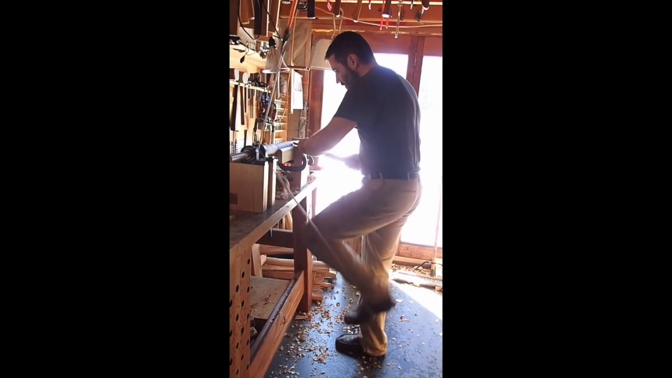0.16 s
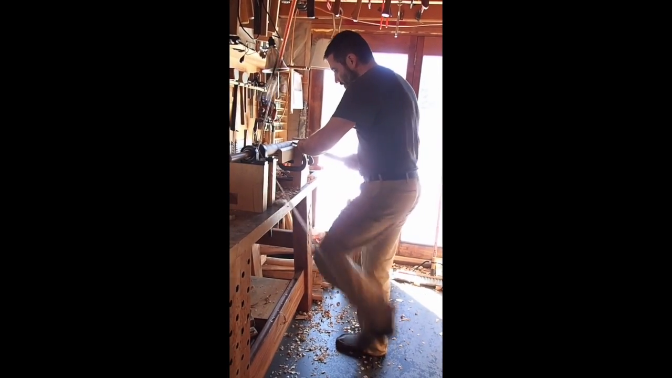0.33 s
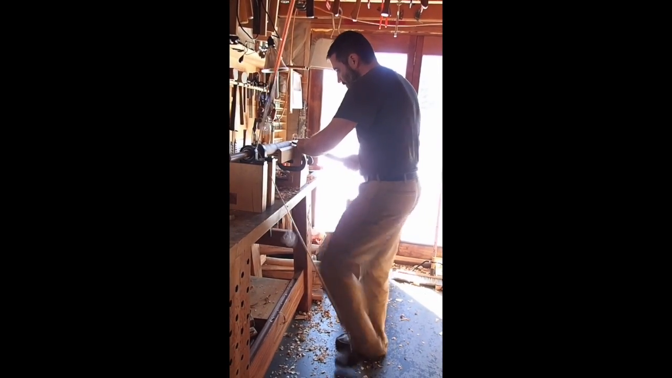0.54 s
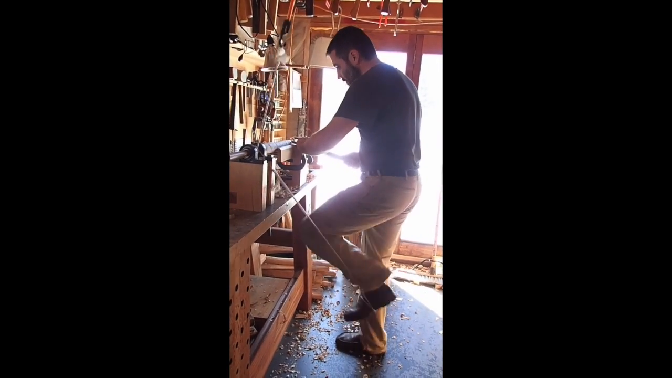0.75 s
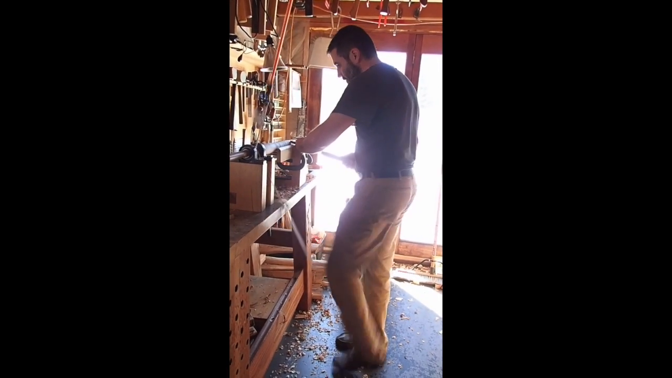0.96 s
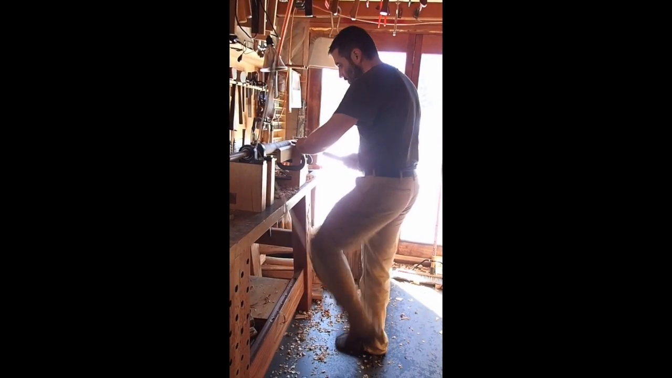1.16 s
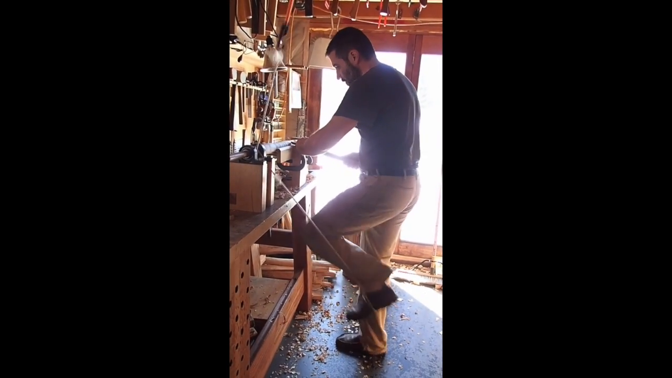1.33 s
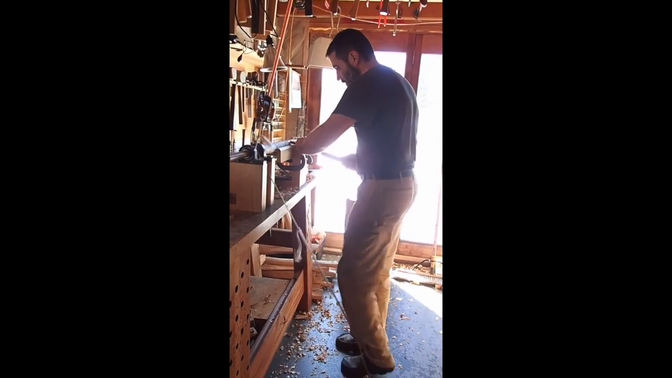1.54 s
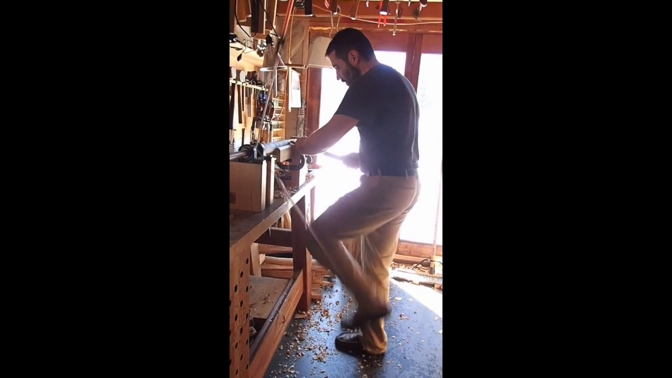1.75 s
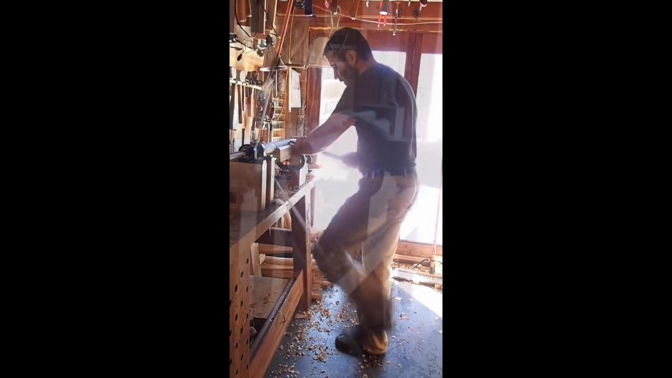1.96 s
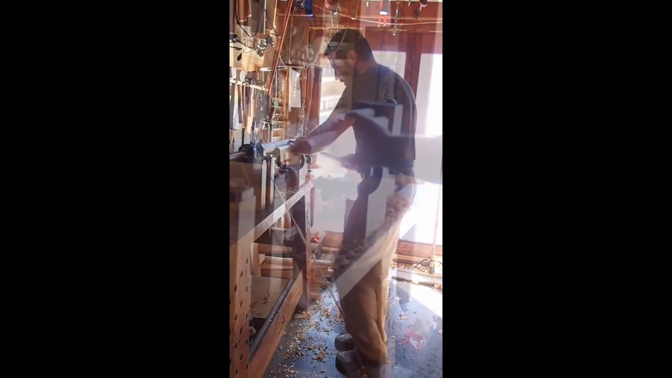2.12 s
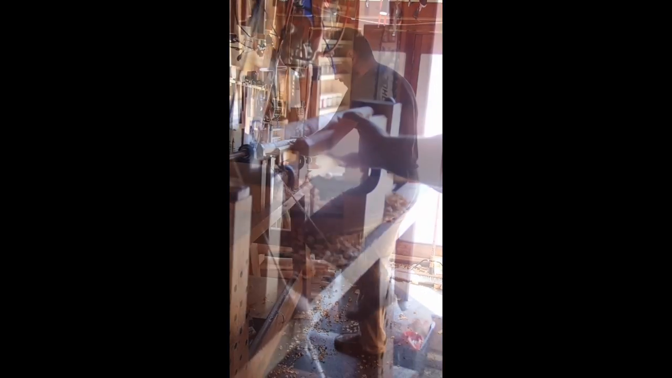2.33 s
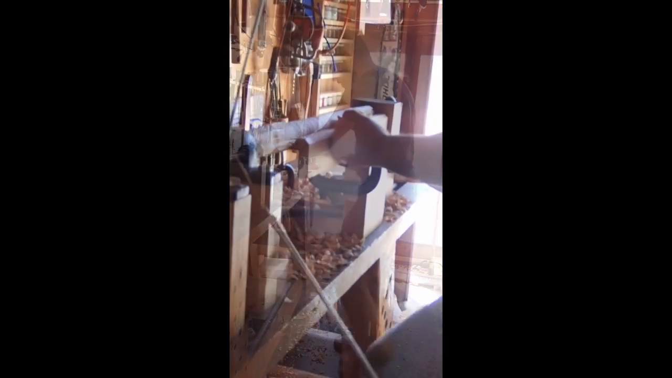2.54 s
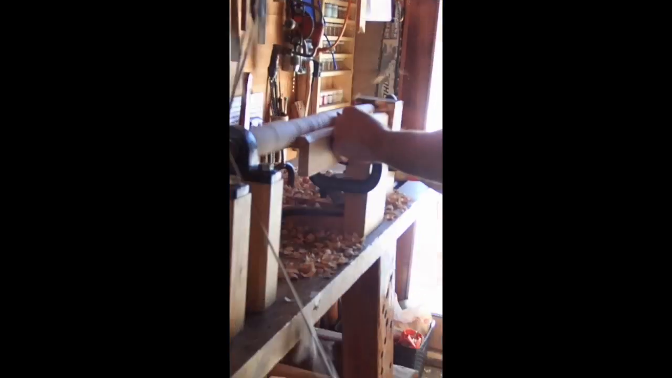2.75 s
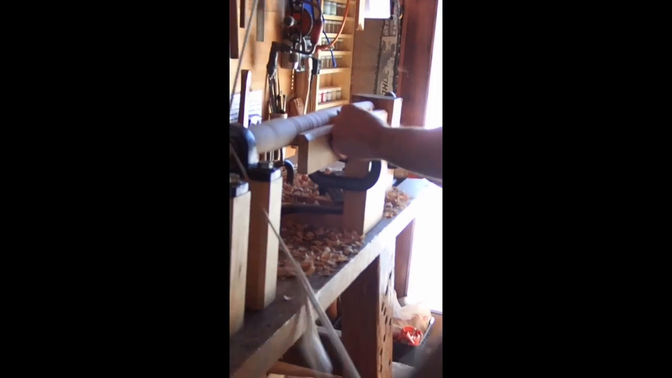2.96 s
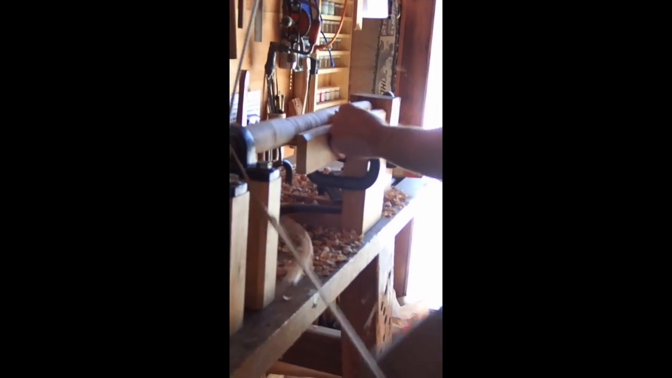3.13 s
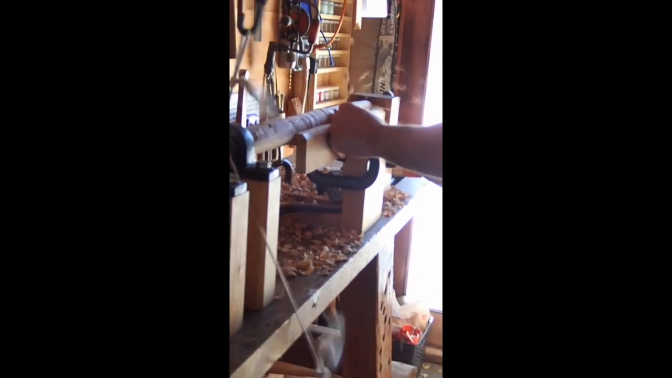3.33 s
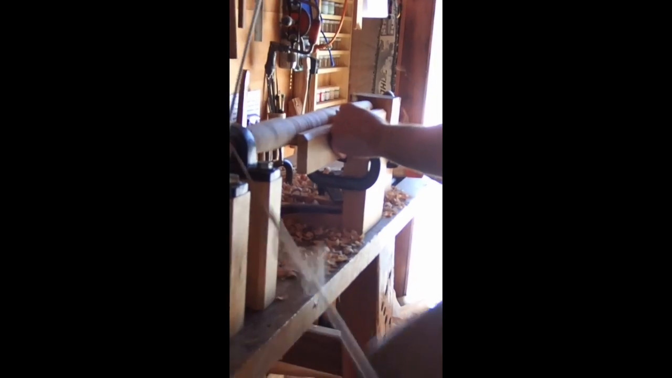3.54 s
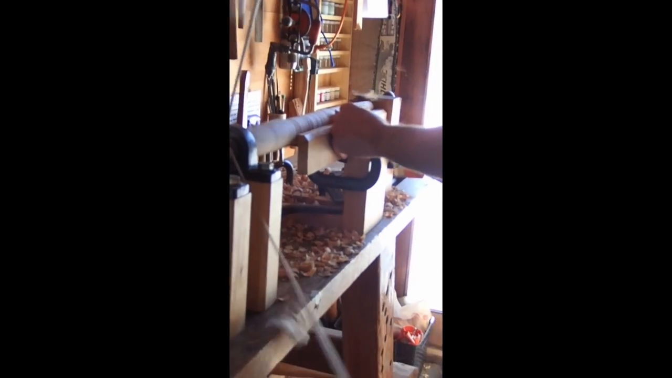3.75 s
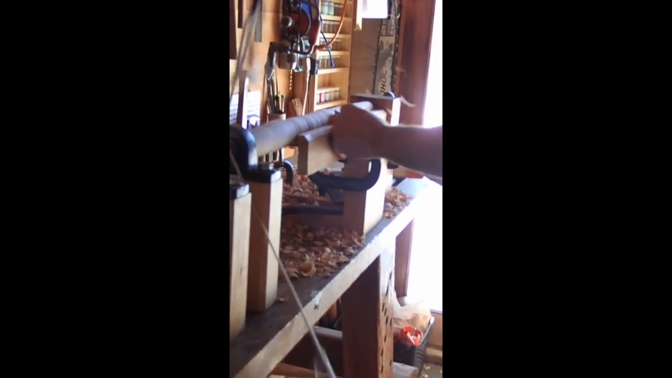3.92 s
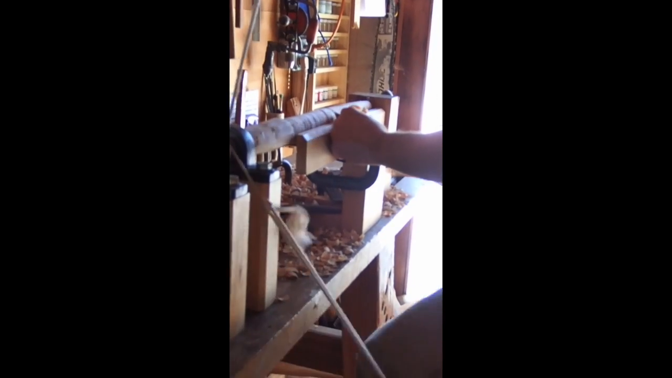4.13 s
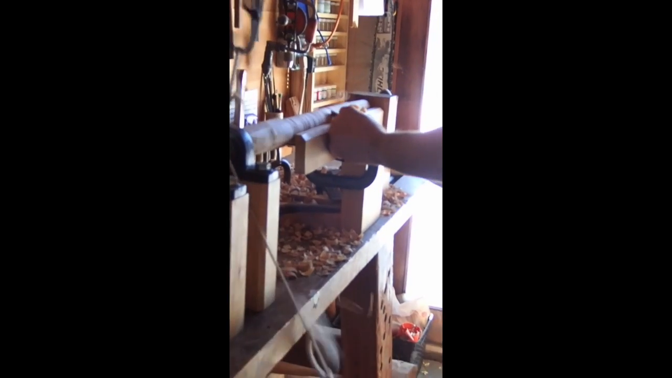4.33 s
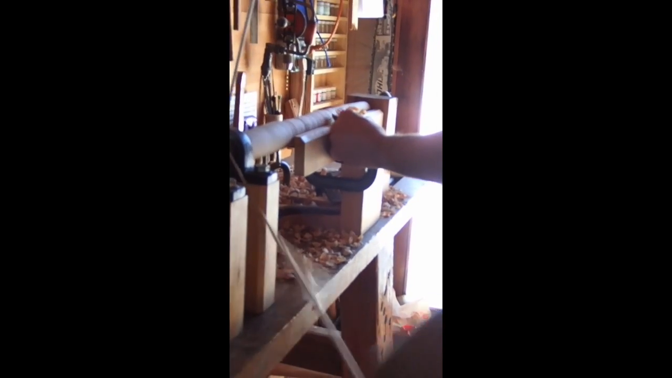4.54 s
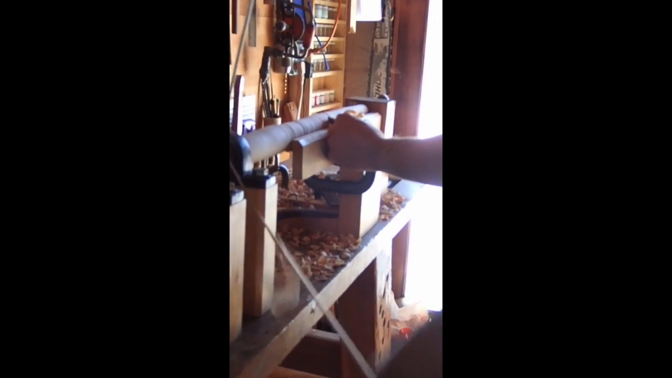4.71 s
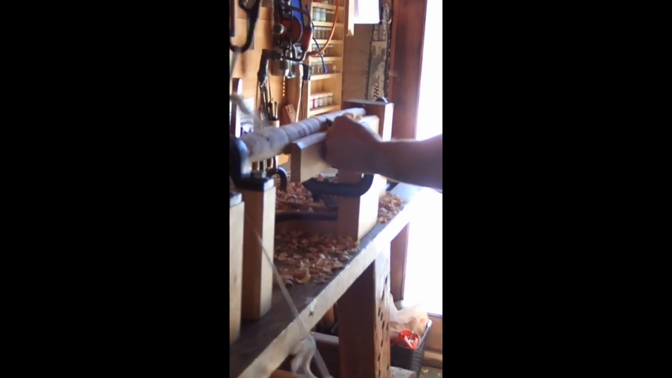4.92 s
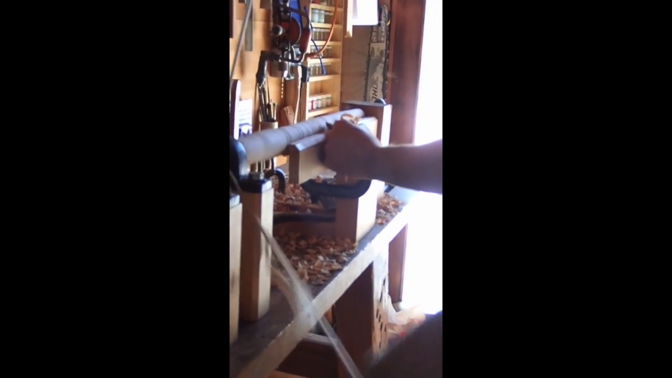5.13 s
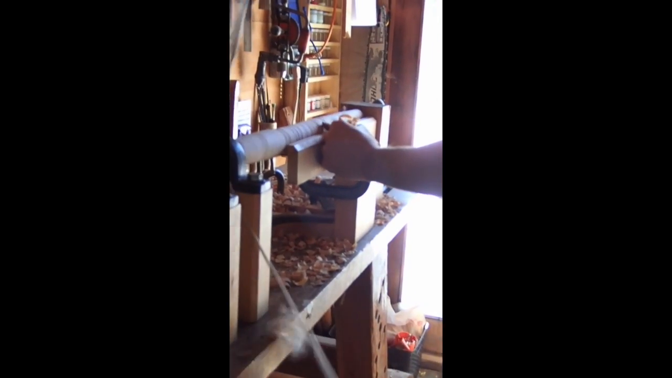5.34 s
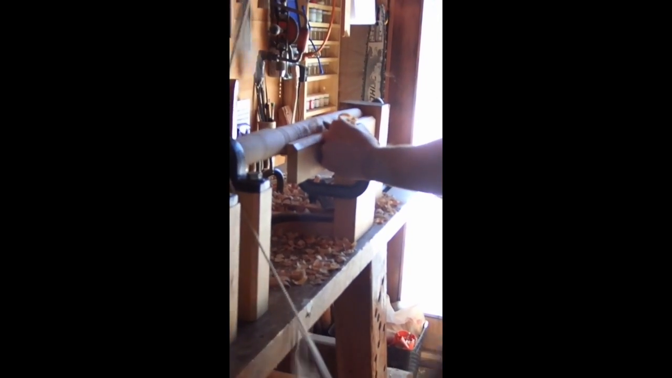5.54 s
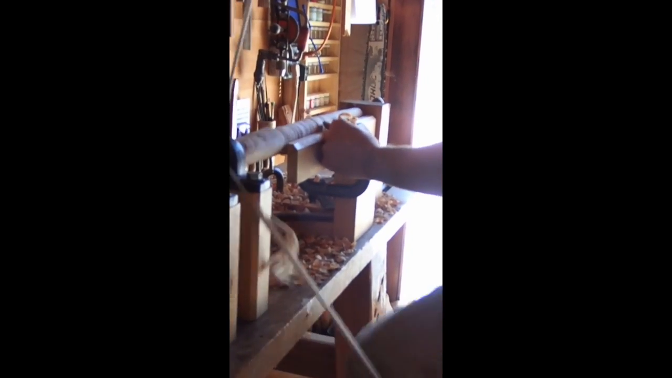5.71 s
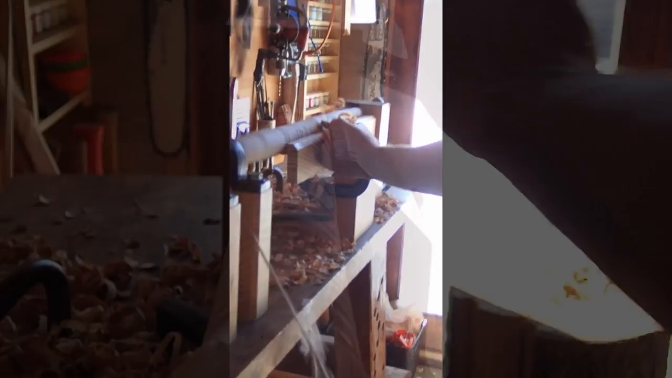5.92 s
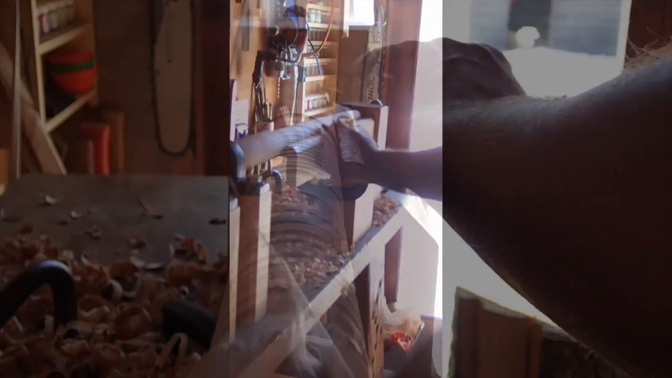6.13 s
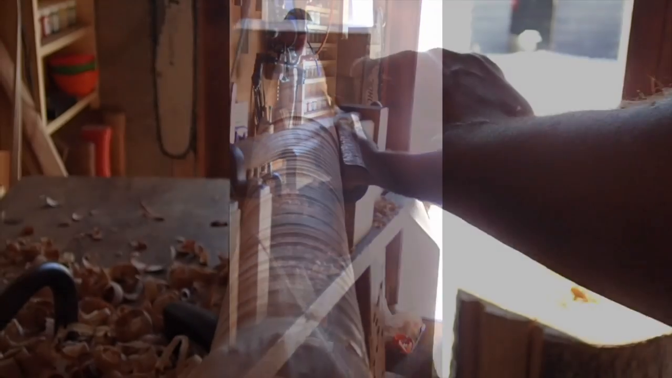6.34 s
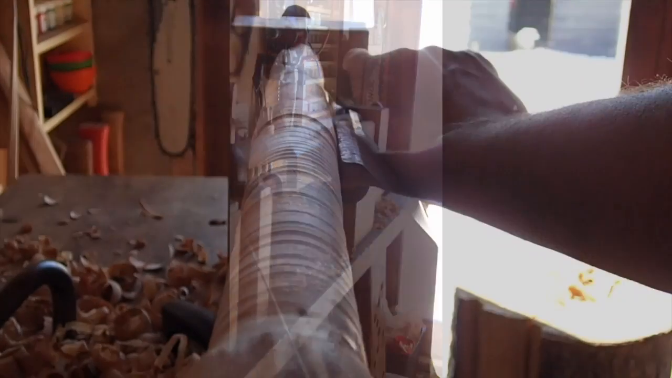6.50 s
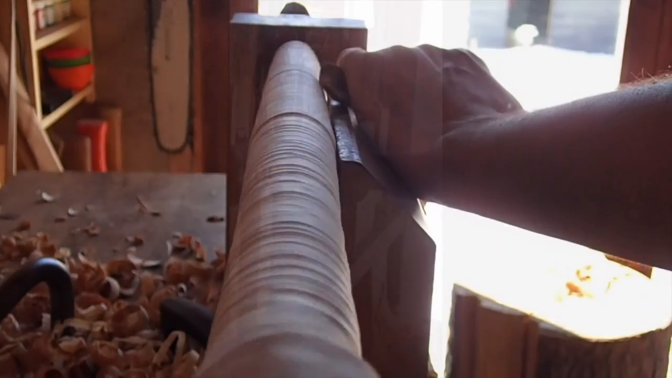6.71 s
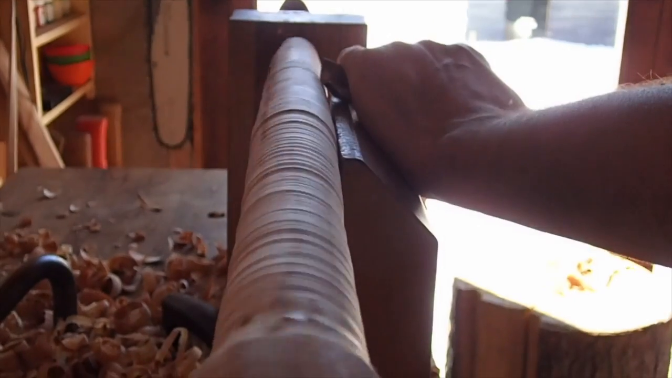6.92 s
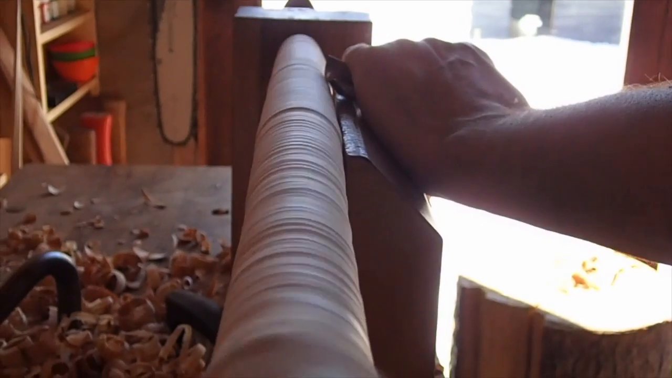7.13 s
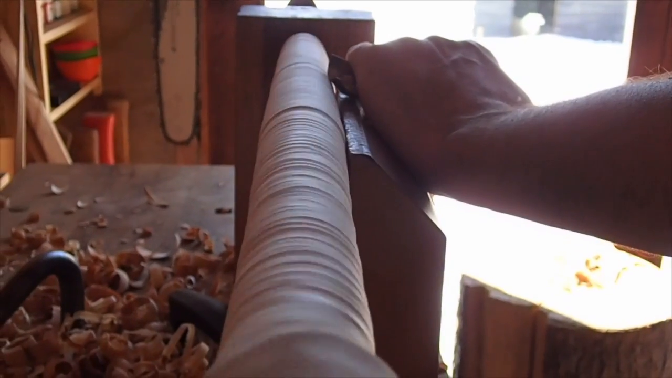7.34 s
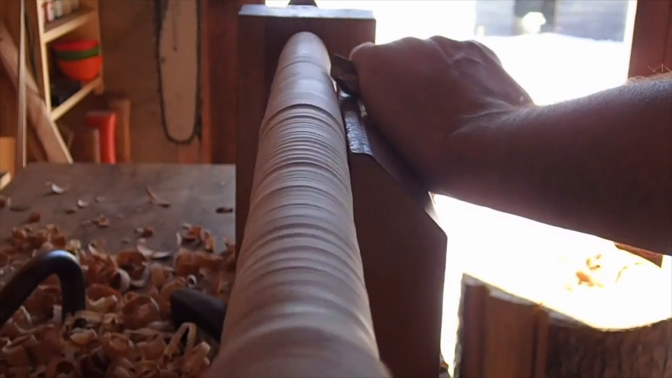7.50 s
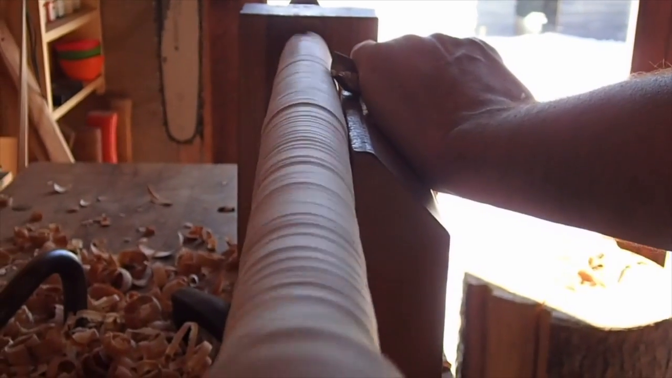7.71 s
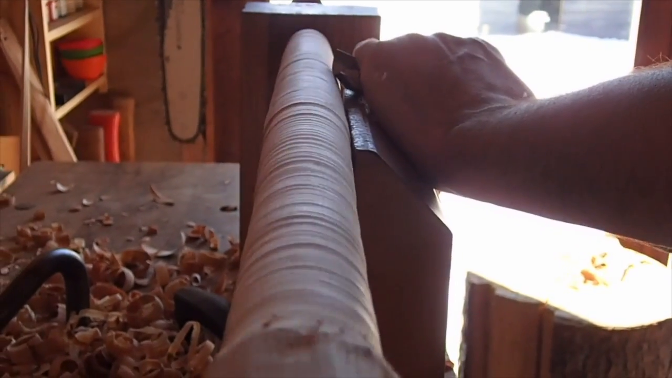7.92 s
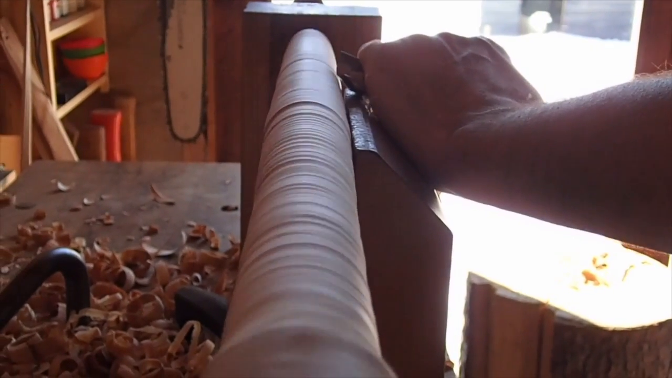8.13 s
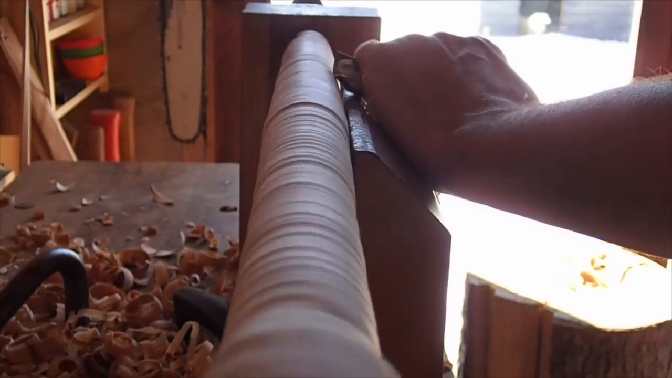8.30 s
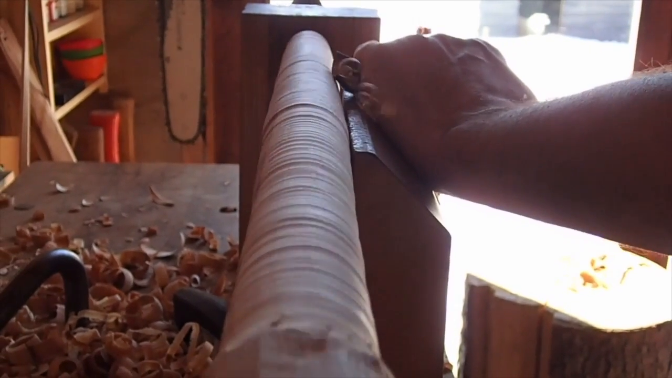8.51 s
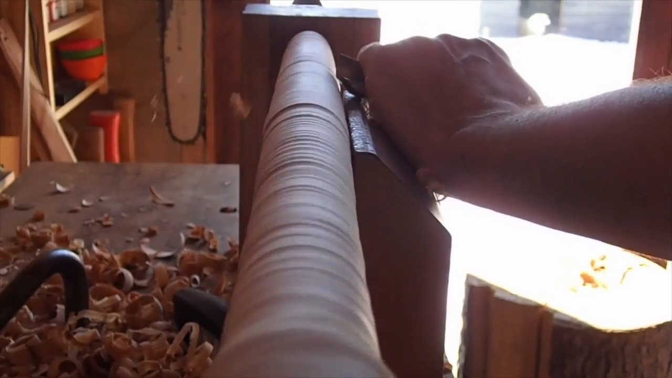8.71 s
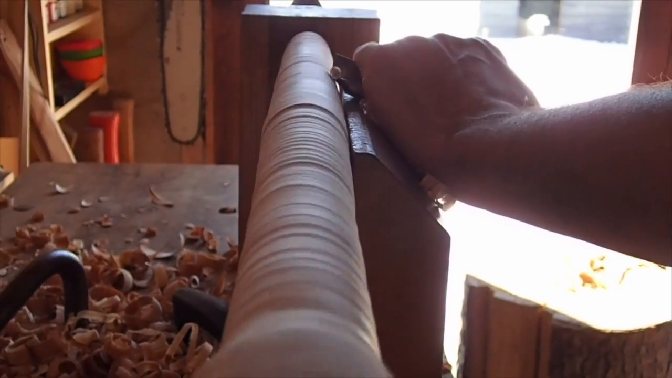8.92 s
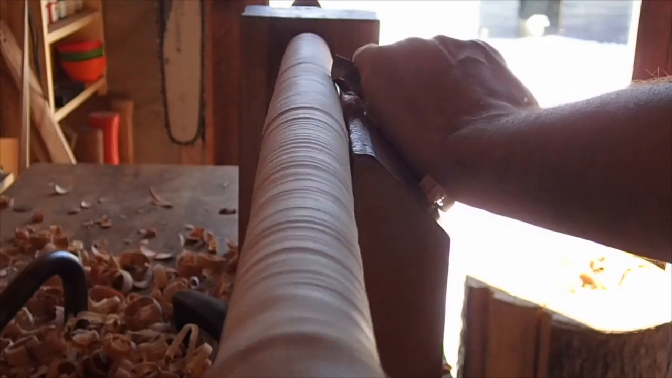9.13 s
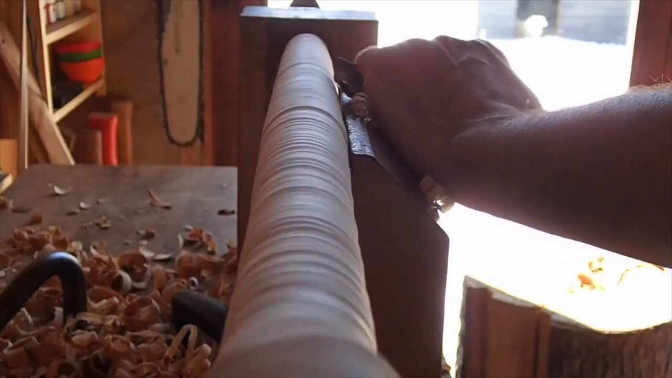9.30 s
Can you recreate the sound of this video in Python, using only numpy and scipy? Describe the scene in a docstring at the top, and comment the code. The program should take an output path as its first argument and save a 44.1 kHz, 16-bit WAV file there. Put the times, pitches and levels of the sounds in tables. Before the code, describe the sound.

A treadle lathe works in a small wooden workshop with a short, dry echo and faint steady hiss. From the start, gritty cutting strokes come roughly every half second, each about 0.2 seconds: a bright tearing hiss over hollow wood resonance, with a slight steel ring. Between them the blank spins back with a soft rub. Chips snap and wood knocks lightly, notably near 0.9 and 1.4. Around 2.2 to 2.5 come two weaker scrapes, then at 2.7 the listening place changes and the even rhythm continues, with tiny dry squeaks near 4.1 and 4.7. After a weaker cut at 6.3, the place moves beside the blank at 6.7: low wooden chatter and small knocks, then cuts building near 7.2, at 7.8, a crisp one at 8.4 and another at 9.0, with louder return rubs and sharp chip clicks near 8.55 and 9.0, ending in rubbing around 9.4.

```python
"""Spring-pole lathe in a wooden workshop

Heard from three listening places in turn, the last beside the blank. Each tread spins the blank into the
gouge: a fine tearing noise drives the shaving's hiss, a coarser one with the same slow swells drives the
modes of blank and bed, and a smoother noise makes the steel sing. On the spring back the blank only rubs the
edge. Chips snap off as clicks, wood knocks as short sine bursts, a dry centre squeaks. The room's answer and
a quiet hiss lie underneath.
"""
import sys
import numpy as np
from scipy import signal
from scipy.fft import rfft, irfft, next_fast_len
from scipy.io import wavfile
from scipy.ndimage import uniform_filter1d, map_coordinates

SR = 44100
rng = np.random.default_rng(int(sys.argv[2]) if len(sys.argv) > 2 else 0)


def to_wav(sig):
    """Store sig (one row per channel, or 1-D mono) as 16-bit WAV at the path in sys.argv[1].

    Samples outside -1..1 are clipped; the rate is SR.
    """
    pcm = np.clip(np.atleast_2d(sig), -1, 1) * 32767
    pcm = np.round(pcm).astype(np.int16)
    wavfile.write(sys.argv[1], SR, pcm.T)  # frames by channels


N = 417186


def amp(db):
    """Decibels to gain."""
    return 10 ** (np.asarray(db) / 20)


def unit(x):
    """Scaled to rms 1."""
    return x / np.sqrt(np.mean(x ** 2) + 1e-20)


def along(points, hz):
    """Curve through (f/Hz, value) points on a log frequency axis."""
    f, v = np.transpose(points)
    return np.interp(np.log(hz + 1), np.log(f + 1), v)


def wobble(rate):
    """A smooth random curve, rate knots a second."""
    knots = rng.standard_normal(int(N * rate / SR) + 4)
    return map_coordinates(knots, [np.arange(N) * rate / SR])


def filtered(x, response):
    """x shaped by a complex response of frequency."""
    m = next_fast_len(x.shape[-1] + 8192)  # room for the ringing
    spectrum = rfft(x, m) * response(np.fft.rfftfreq(m, 1 / SR))
    return irfft(spectrum, m)[..., :x.shape[-1]]


def causal(points):
    """Minimum-phase response of (f/Hz, level/dB) points, so that clicks ring after the blow."""
    def response(f):
        cepstrum = irfft(np.log(amp(along(points, f))))
        cepstrum[1:len(f) - 1] *= 2
        cepstrum[len(f):] = 0
        return np.exp(rfft(cepstrum))
    return response


def modes(table, place):
    """A body's resonances at one place: damped modes summed with alternating sign."""
    def response(f):
        total = 0
        for k, row in enumerate(table):
            hz, width, level_db = row[0], row[1], row[2 + place]
            damping = 1j * f * width
            total = total + (-1) ** k * amp(level_db) * damping / (hz ** 2 - f * f + damping)
        return total
    return response


def patchy(x, depth_db, bins, frames):
    """Random gain patches over time and frequency, alike in both rows."""
    z = signal.stft(x, nperseg=512)[2]
    field = uniform_filter1d(rng.standard_normal(z.shape[1:]), bins, 0)
    field = uniform_filter1d(field, frames, 1)
    return signal.istft(z * amp(depth_db * unit(field)), nperseg=512)[1][:, :N]


# moments when the listening place changes: t/s
MOVE_TIMES = [2.676, 6.67]


def places():
    """Sample ranges of the three listening places."""
    edges = [0] + [round(s * SR) for s in MOVE_TIMES] + [N]
    return [slice(a, b) for a, b in zip(edges, edges[1:])]


# spectrum of room air and microphone hiss: f/Hz, relative level per Hz/dB
STILL_SPECTRUM = [(18, -49), (30, -5.5), (327, -1.5), (511, -4.5), (757, -5.5), (1460, -9), (1850, -13),
                  (3120, -20), (4060, -20), (5420, -6.5), (9410, -17), (14300, -20.5), (15900, -31)]
# its mean level at each listening place: level/dB
STILL_LEVELS = [-50, -49.5, -50.5]


def still():
    """The quiet workshop and the microphones' own hiss: coloured noise with a slowly wavering level."""
    air = unit(filtered(rng.standard_normal((2, N)), lambda f: amp(along(STILL_SPECTRUM, f))))
    place = np.searchsorted(MOVE_TIMES, np.arange(N) / SR)
    return air * amp(np.array(STILL_LEVELS)[place] + 0.8 * wobble(6))


# decay of the workshop's answer: f/Hz, time to fall 60 dB t60/s
SHOP_DECAY = [(200, 0.39), (2000, 0.16), (10000, 0.083)]


def shop(x):
    """Reverberation from a noise tail in which each frequency dies at its own speed."""
    hz, t, z = signal.stft(rng.standard_normal((2, SR // 2)), SR, nperseg=256)
    decay = amp(-60 * t / along(SHOP_DECAY, hz)[:, None])
    tail = signal.istft(z * decay, SR, nperseg=256)[1]
    late = np.pad(x, ((0, 0), (300, 0)))  # pre-delay in samples
    return signal.fftconvolve(late, tail / np.linalg.norm(tail[0]), axes=1)[:, :N]


# a dry centre as the blank turns about: t/s, length/s, f/Hz, level/dB before the wavering
SQUEAK_EVENTS = [(4.11, .05, 1705, -51), (4.696, 0.042, 1700, -51)]


def squeaks():
    """Short wavering tones of wood on steel: sines under a rounded envelope."""
    out = np.zeros(N)
    for s, length, hz, db in SQUEAK_EVENTS:
        t = np.arange(round(length * SR)) / SR
        envelope = np.sin(np.pi * t / length) ** 0.4
        out[round(s * SR):][:len(t)] = amp(db) * np.sin(2 * np.pi * hz * t) * envelope
    return out * amp(1.5 * wobble(90))


# chips that snap off: t/s, relative click level/dB
CHIP_SNAPS = [(0.3714, -15), (0.4614, -17), (0.889, 0), (1.4367, 0.5), (1.5604, -5), (1.8921, -17),
              (2.683, -7), (3.7007, -2), (4.1855, -18), (4.7768, 0), (5.3338, -13), (6.1254, -24),
              (6.739, -19), (7.9504, -3), (8.5508, 4.5), (9.0204, 0), (9.141, -9)]
# the blank knocks in its seats or chatters against the edge: t/s, force level/dB, f/Hz, length/s
WOOD_KNOCKS = [(0.083, -40, 1370, 0.016), (0.34, -30, 1193, .02), (0.458, -22, 1060, .003),
               (0.885, -26, 1600, 0.029), (.922, -27, 1600, 0.017), (1.033, -30, 1316, 0.029),
               (1.445, -28.5, 1600, 0.013), (1.987, -27, 1200, 0.014), (2.24, -36, 1354, 0.0099),
               (3.203, -30, 1356, 0.012), (4.257, -24, 1270, 0.0054), (4.774, -28.5, 713, 0.01),
               (5.338, -27.5, 1330, 0.0072), (5.836, -30.5, 1360, .012), (5.965, -30.5, 790, 0.0072),
               (6.123, -34, 730, 0.003), (6.684, -40, 94.2, 0.021), (6.704, -45.5, 466, 0.014),
               (6.734, -46, 470, .015), (6.811, -36, 398, 0.0073), (6.822, -38, 436, .012),
               (6.839, -38, 380, .022), (6.951, -35.5, 445, 0.0069), (6.972, -43, 420, .012),
               (7.0, -46, 423, 0.011), (7.181, -40, 372, 0.01), (7.237, -41, 826, .012),
               (7.326, -30, 515, 0.011), (7.335, -24, 1190, .006), (7.421, -30.5, 450, 0.0042),
               (7.459, -32.5, 603, 0.0035), (7.53, -41, 895, 0.0032), (7.885, -30.5, 360, .012),
               (7.945, -25, 390, 0.0054), (8.486, -30.5, 1510, 0.0064), (8.639, -39, 390, .007),
               (8.688, -29, 698, .004), (9.084, -33, 766, 0.037), (9.141, -28, 576, 0.007),
               (9.244, -42, 770, 0.018), (9.271, -36, 500, 0.0045), (9.333, -40, 343, 0.033)]


def blows():
    """Clicks of chips with a short crackle, faint ticks of falling shavings, soft wooden sine bursts."""
    snap, knock = np.zeros((2, N + SR))
    t = np.arange(SR // 20) / SR
    for s, db in CHIP_SNAPS:
        crackle = 0.16 * amp(-60 * t / 0.05) * rng.standard_normal(len(t))
        snap[round(s * SR):][:len(t)] += amp(db) * (crackle + (t == 0))
    ticks_per_s = 14
    ticks = (rng.random(N + SR) < ticks_per_s / SR) * amp(-21 + 4 * rng.standard_normal(N + SR))
    snap[2:] += np.diff(ticks, n=2)  # tiny pieces sound thin
    for s, db, hz, length in WOOD_KNOCKS:
        turns = np.arange(round(length * SR)) * hz / SR
        envelope = np.sin(np.pi * np.sqrt(turns / turns[-1]))  # rises faster than it falls
        knock[round(s * SR):][:len(turns)] += amp(db) * np.sin(2 * np.pi * turns) * envelope
    return snap[:N], knock[:N]


# the edge bites as the treadle goes down: start t/s, entry level under full/dB, swell/s, length/s,
# full level/dB, level at letting go/dB, then over the hiss: blank's high modes level/dB,
# low modes level/dB, bed level/dB; singing of the steel level/dB, treble of the shaving level/dB
CUT_STROKES = [(-.2, 3, .02, 0.14, -20, -19.5, -1, 0.5, -2, 0, 0),
               (0.325, 5.9, 0.025, .14, -21, -18.5, -3, -4, -9.5, 2, 1),
               (.826, 14, 0.06, 0.21, -22, -20, -3.5, -6, -13, -7, 3),
               (1.404, 2, 0.01, .02, -29, -26.5, -5.5, -2.5, -11, 0, 4),
               (1.43, 1.7, 0.011, 0.16, -21.5, -19, -4, -5, -13, 0.5, 2),
               (1.946, 10.3, 0.051, 0.17, -20, -21.5, -3.5, -3.5, -9.5, 7, 1),
               (2.169, 3.6, 0.099, 0.12, -30, -30, -4, -5.5, -10, 14, 2.5),
               (2.478, 5.8, 0.066, .185, -32, -32.5, -7.5, -10, -13.5, 5, 1.5),
               (2.677, 1.2, 0.02, 0.18, -19.5, -22, -5, -7.5, -8, 1, -2),
               (3.161, 13.7, 0.054, 0.23, -18.5, -22, -3.5, -7, -9.5, 0.5, 0.5),
               (3.675, 3, 0.013, 0.022, -28, -30, -6, -5, -5, 2, -2),
               (3.697, 3, .014, 0.19, -18, -24, -6, -5.5, -6.5, 4, 1),
               (4.222, 3.8, 0.033, .17, -19.5, -24.5, -4.5, -7.5, -12.5, 1.5, -1),
               (4.754, 6, .022, .19, -19.5, -20, -4, -7.5, -12.5, -1, -1),
               (5.281, 1, 0.015, 0.026, -25, -28, -13, -13.5, -15.5, 5.5, -2),
               (5.327, 1.2, 0.016, 0.18, -19.5, -26, -7.5, -6.5, -11.5, 1, -2.5),
               (5.82, 0.88, 0.015, 0.16, -18, -22, -5.5, -8, -8.5, 0, -0.5),
               (6.321, 6.8, 0.034, 0.2, -24, -31, -4, -7, -12, -1, -1.5),
               (7.1, 3.6, .03, 0.052, -38.5, -39, -5.5, -6, -4.5, 11, 0),
               (7.172, 11, 0.042, 0.063, -27.5, -32, -6.5, -3, -1.5, 4, 5),
               (7.254, 18.5, 0.051, 0.063, -23, -22.5, -6, -3, -9.5, 6.5, 3.5),
               (7.755, 9.3, 0.077, 0.12, -26, -29, -9.5, -3.5, -4.5, 2, 5),
               (7.88, 2, 0.022, 0.04, -30.5, -33, -3, 5.5, -1, -3, -2),
               (7.943, 1, 0.01, 0.006, -25, -25, -15, -2.5, -7, 4, 1),
               (8.38, 7.3, 0.06, 0.18, -20.5, -25.5, -12.5, -5.5, -9, 2.5, 5),
               (8.98, 15, 0.046, 0.14, -19, -28.5, -7, -6, -12.5, 3, 4.5),
               (9.133, 1, 0.011, 0.012, -23, -25.5, -7.5, 0, -4, 1, -2)]
# the pole spins the blank back and it rubs the edge: start t/s, length/s, fastest at share/0-1,
# level/dB at full speed, then over the hiss: high modes level/dB, low modes level/dB, bed level/dB
RUB_STROKES = [(0.034, 0.23, 0.37, -41, 2, 5, -1.5), (.53, .29, 0.49, -40, -4.5, -2, -3.5),
               (1.101, 0.24, 0.58, -38.5, -6, -4.5, -5), (1.636, 0.33, 0.42, -42.5, -7, -2, -3),
               (2.883, 0.31, 0.36, -39.5, -7, -2.5, -6), (3.452, .22, .5, -40.5, -3.5, 0, -4),
               (3.903, 0.3, 0.47, -39, -6, -1.5, -4.5), (4.434, 0.34, 0.42, -39, -7.5, -3, -5),
               (5.049, 0.23, 0.4, -41, -4, -2.5, -3.5), (5.533, 0.29, 0.47, -39, -6.5, -4, -4.5),
               (6.027, 0.3, 0.46, -39.5, -2.5, -3.5, -3.5), (6.676, 0.19, 0.32, -45, -2.5, 1.5, 2.5),
               (6.801, 0.24, 0.26, -41, -1, 1.5, 3.5), (6.936, .11, 0.38, -39.5, -1, 1.5, 1),
               (7.407, 0.35, 0.34, -39.5, -2, -0.5, -1), (8.016, .33, 0.48, -36, -5, -1.5, -3),
               (8.604, 0.32, 0.48, -35, -3, 0.5, -0.5), (9.177, 0.32, 0.53, -32.5, -4, -3.5, -4.5)]
# rows hiss, high modes, low modes, bed: lag behind the edge/s, change over one cut from afar/dB,
# the same heard beside the blank/dB, change over one rub/dB
BODY_FOLLOW = [(0, 0.5, -0.5, 0), (.003, -6, -0.5, -8), (.004, -4, 2, -3.5), (.008, 3, 3, -5)]
RUB_GROWS = 2.08  # rubbing force as a power of the speed
BITE_S, BITE_DB_PER_S, RELEASE_DB_PER_S = 0.004, 2600, 229  # how the edge enters and leaves the wood


def strokes():
    """Level curves/dB of hiss, high modes, low modes, bed; then singing and treble of the latest cut."""
    ms = np.arange(0, N / SR, 0.001)  # time in s, one point a millisecond
    start, entry, swell, length, full, end, *more = np.transpose(CUT_STROKES)[..., None]
    back, span, fastest, peak, *rub_over = np.transpose(RUB_STROKES)[..., None]
    beside = start > MOVE_TIMES[-1]
    turn = np.clip((ms - back) / span, 0, 1)
    speed = abs(np.sin(np.pi * turn ** (np.log(0.5) / np.log(fastest))))
    levels = []
    for (lag, far_tilt, near_tilt, rub_tilt), over, under in zip(BODY_FOLLOW, [0] + more, [0] + rub_over):
        t = ms - lag - start
        held = full - abs(entry) * np.clip(1 - t / swell, 0, 1) + over
        held = held + (end - full) * np.clip((t - swell) / (length - swell), 0, 1)
        held = held + np.where(beside, near_tilt, far_tilt) * (np.clip(t / length, 0, 1) - 0.5)
        bite_db = BITE_DB_PER_S * np.clip(BITE_S - t, 0, 1)
        release_db = RELEASE_DB_PER_S * np.clip(t - length, 0, 1)
        cut_power = amp(held - bite_db - release_db) ** 2
        rub_power = (amp(peak + under + rub_tilt * turn) * speed ** RUB_GROWS) ** 2
        levels.append(10 * np.log10(cut_power.sum(0) + rub_power.sum(0) + 1e-7))
    latest = np.searchsorted(start[:, 0], ms) - 1
    levels += [uniform_filter1d(colour[latest, 0], size=20) for colour in more[3:]]
    return [np.interp(np.arange(N) / SR, ms, level) for level in levels]


def tearing(grain_db, spike_db, spikes):
    """Force of tearing fibres: noise with a fluctuating level and sparse sharper breaks; two unlike rows."""
    breaks = (rng.random(N) < spikes / SR) * amp(spike_db + 1.1 * rng.standard_normal(N))
    return amp(grain_db) * (rng.standard_normal((2, N)) + breaks * rng.choice([-1, 1], (2, N)))


# shaving hiss through the microphone housing, one list for each place: f/Hz, relative level per Hz/dB
HISS_SPECTRA = [
    [(1120, -25), (1900, -12.5), (2040, -18.5), (2620, -13.5), (3100, -8.5), (3420, -30.5), (3700, -8.5),
     (4010, -27.5), (4380, -8), (5330, 3.5), (6420, -4), (6960, -9.5), (10900, -27), (12700, -24.5),
     (15900, -31)],
    [(1120, -34), (1900, -14), (2100, -18), (2690, -19), (3130, -14.5), (3940, -21), (5470, 3),
     (6590, -11.5), (6770, -9), (10100, -22), (10800, -29.5), (12700, -25), (13100, -27), (14800, -27),
     (15900, -43)],
    [(300, -27.5), (1120, -2), (1900, -9.5), (2330, -14), (2640, -16), (3150, -13), (3390, -22),
     (4010, -24), (4540, -4), (5520, 2), (6090, -3), (6830, -11.5), (8240, -11.5), (10300, -28.5),
     (14300, -22), (15900, -38)],
]
# modes of the blank between centres: f/Hz, width/Hz, relative level/dB at place 1, 2, 3
BLANK_MODES = [(467, 52.4, -7, -5.5, 3.5), (567, 79, -9, -8, 0), (745.3, 77, -2.5, 0.5, 4.5),
               (899, 128, -5.5, -4, 2.5), (1100, 45, -5.5, -5, -10), (1183, 63, -5, -6, -12),
               (1370, 248, -5.5, -5, -8), (1478, 94, -4.5, -3, -1), (1600, 54, -4.5, -10, 2),
               (2100, 130, -12.5, -12.5, -9), (2230, 65, -13.5, -13, -4.5),
               (2392, 147, -18.5, -19.5, -12.5), (3082, 96, -14, -13.5, -10)]
# modes of bed and legs: f/Hz, width/Hz, relative level/dB at place 1, 2, 3
BED_MODES = [(66.4, 41, -26, -22, -4), (145.3, 26, -8.5, -2.5, -6.5), (183, 22, -5.5, -1.5, -5.5),
             (253.6, 50, -1, 1.5, -7.5), (300.3, 63.6, 3.5, 2, -2), (380.5, 137, -0.5, -2, 1.5)]
# modes of the gouge: f/Hz, width/Hz, relative level/dB at place 1, 2, 3
GOUGE_MODES = [(3678, 72, -34, -26.5, -26), (4520, 43, -39, -18.5, -16), (5310, 120, -22.5, -13.5, -23),
               (6380, 57, -17.5, -9.5, -16), (7050, 50, -57, -58, -47), (8650, 60, -29, -36, -46),
               (9690, 49, -42, -30, -56), (12330, 43, -42, -20, -36), (14800, 90, -40, -58, -34)]
LOW = 5  # the first modes bend the whole blank


def cut():
    """The gouge on the blank: fine tearing drives the shaving, coarse the wood, smoother noise the steel."""
    hiss_db, high_db, low_db, bed_db, sing_db, treble_db = strokes()
    bite = 1.65 * wobble(22) + 0.95 * wobble(60)  # an out-of-round blank and its grain change the depth
    fine = tearing(bite + 0.92 * wobble(350), spike_db=10.0, spikes=110)
    fine = patchy(fine, depth_db=2.0, bins=4, frames=4)
    treble = filtered(fine, lambda f: 1 / (1 + (7500 / (f + 1)) ** 8))
    fine = fine + (amp(treble_db) - 1) * treble
    # the edge wanders over the grain, so each mode of the wood is fed unevenly
    coarse = tearing(1.28 * bite + 1.36 * wobble(150), spike_db=15.0, spikes=67)
    coarse = patchy(coarse, depth_db=3, bins=2, frames=5)
    load_db = hiss_db + 0.9 * (hiss_db + 21)  # steel sings mostly under load
    singing = patchy(rng.standard_normal((2, N)), depth_db=4.5, bins=5, frames=9)
    singing = amp(load_db + sing_db + 24.0) * singing
    snap, knock = blows()
    out = np.zeros((2, N))
    for place, part in enumerate(places()):
        for force, level_db, blow, body in [
                (fine, hiss_db, snap, causal(HISS_SPECTRA[place])),
                (coarse, high_db, knock, modes(BLANK_MODES[LOW:], place)),
                (coarse, low_db, knock, modes(BLANK_MODES[:LOW], place)),
                (coarse, bed_db, 0.46 * knock, modes(BED_MODES, place))]:
            scale = np.std(filtered(force[0, part], body))  # the level curve sets the loudness
            drive = amp(level_db) * force + blow
            out[:, part] += filtered(drive[:, part], body) / scale
        out[:, part] += filtered(singing[:, part], modes(GOUGE_MODES, place))
    return out


# share that the two ports do not have in common: f/Hz, side level/dB
PORTS_APART = [(40, -16), (120, -24), (300, -25), (1500, -27), (3600, -19), (4300, -11), (5500, -10.5),
               (7000, -6.5), (9000, -5.5), (15000, -5.5)]
# level of the left port over the right: f/Hz, level/dB
LEFT_OVER_RIGHT = [(100, -1.5), (1000, -0.53), (3500, -1.5), (4800, -5), (5200, -8), (5500, 3), (5850, 2.5),
                   (6600, 0.5), (9000, 0), (15000, 0.7)]
# port resonances differ: f/Hz, left leads by phase/rad
LEFT_LEADS = [(4400, 0.024), (4800, 0.035), (5430, 1), (6100, 0.3), (7000, 0.83)]


def scene():
    """Two close microphone ports: alike in the bass, less so in the treble."""
    lathe = cut() + squeaks()
    pair = lathe + amp(-12) * shop(lathe) + still()
    mid, side = filtered(pair, lambda f: np.array([f * 0 + 1, amp(along(PORTS_APART, f))]))

    def half(f):
        """Half of the difference between the ports."""
        return amp(along(LEFT_OVER_RIGHT, f) / 2) * np.exp(0.5j * along(LEFT_LEADS, f))
    return filtered(np.array([mid + side, mid - side]), lambda f: np.array([half(f), 1 / half(f)]))


# narrow bands that the microphone housing cancels: f/Hz, width/Hz, depth/0-1
HOUSING_NOTCHES = [(1923, 71, 0.8), (4800, 69, 1)]
TOP_HZ = 15780  # band limit


def housing(f):
    """Colour of the microphone housing: weak deep bass, notches, nothing above the band limit."""
    notches = 1
    for hz, width, depth in HOUSING_NOTCHES:
        notches = notches * (1 - depth / (1 + (2 * (f - hz) / width) ** 2))
    return notches * f ** 3 / (f ** 3 + 50 ** 3) * (f < TOP_HZ)


def record(dry):
    """Soft saturation rounds off the highest peaks, then the housing colours the sound."""
    soft = dry / (1 + np.abs(dry / 0.75) ** 4) ** (1 / 4)
    return filtered(soft, housing)


dry = scene()
out = record(dry)
to_wav(out)
```